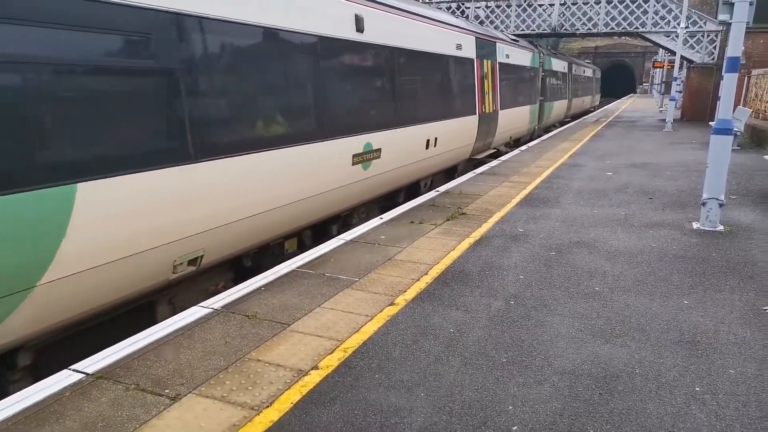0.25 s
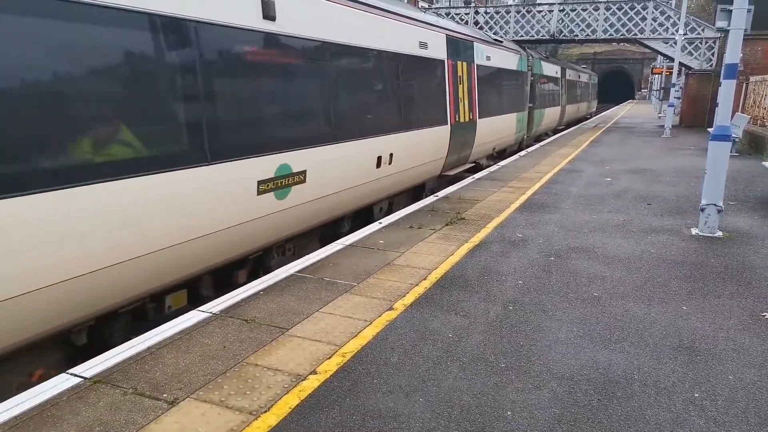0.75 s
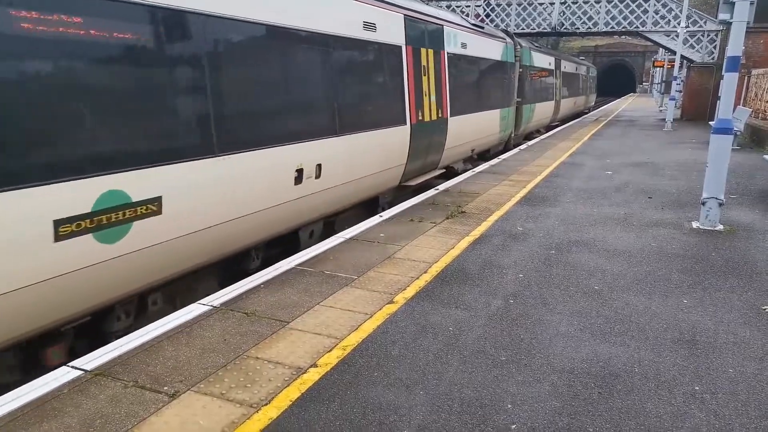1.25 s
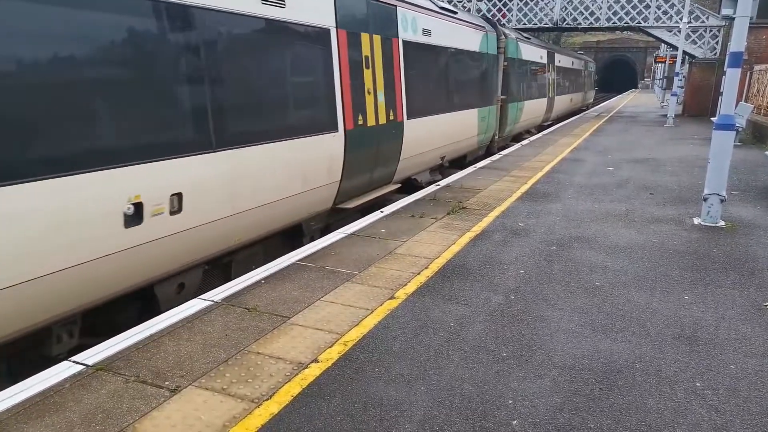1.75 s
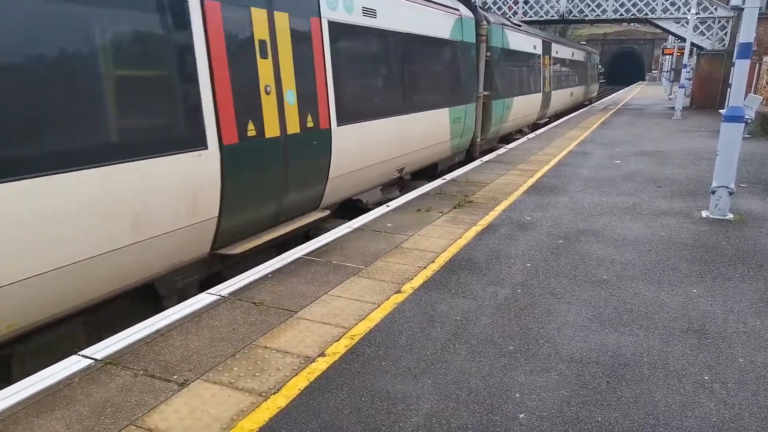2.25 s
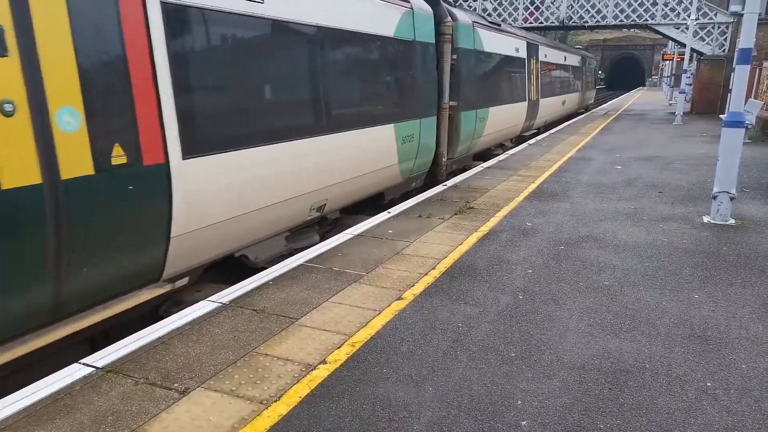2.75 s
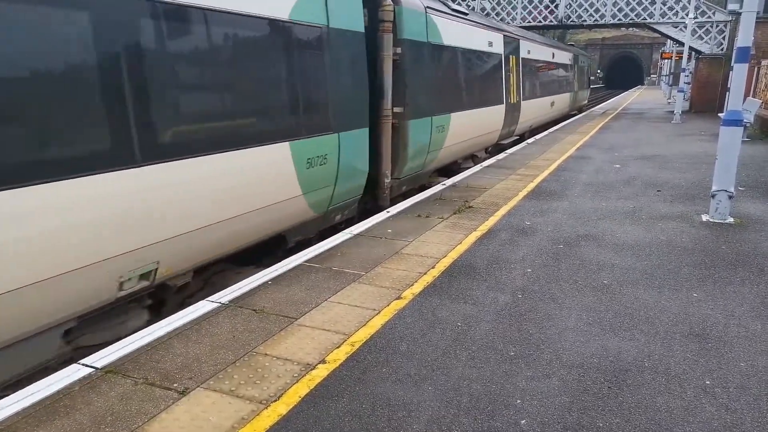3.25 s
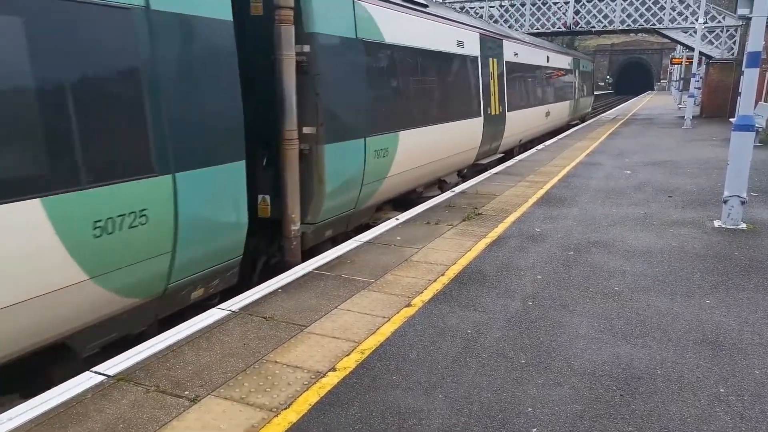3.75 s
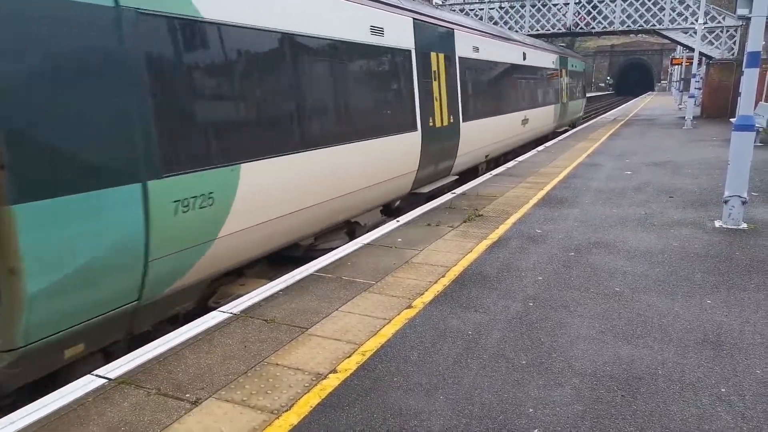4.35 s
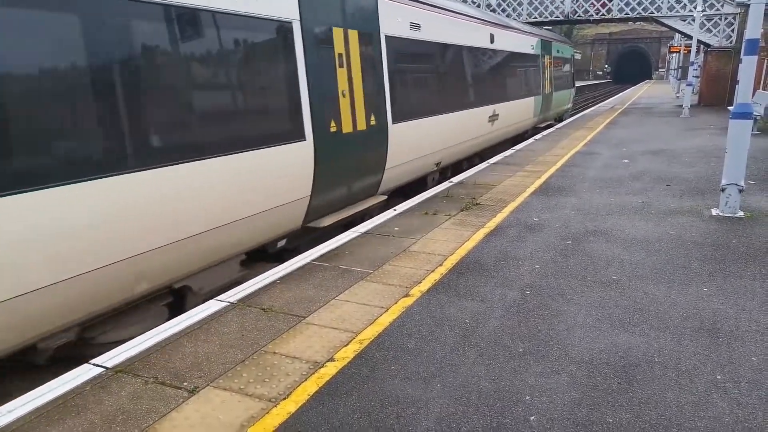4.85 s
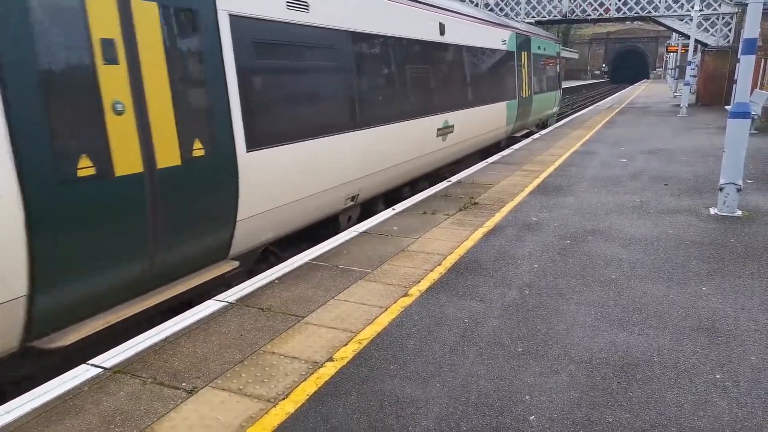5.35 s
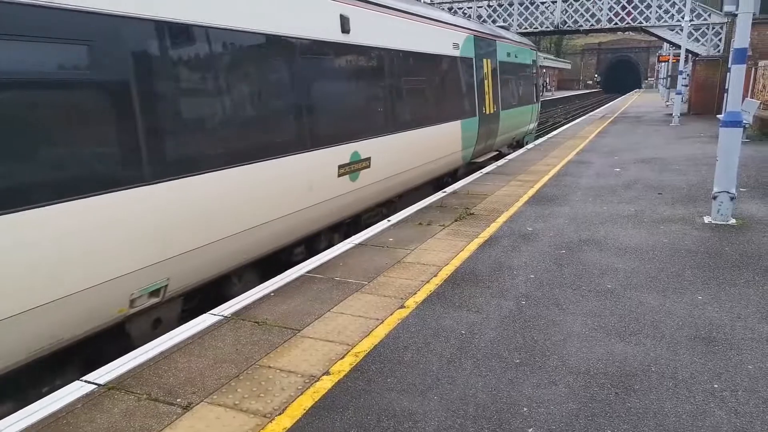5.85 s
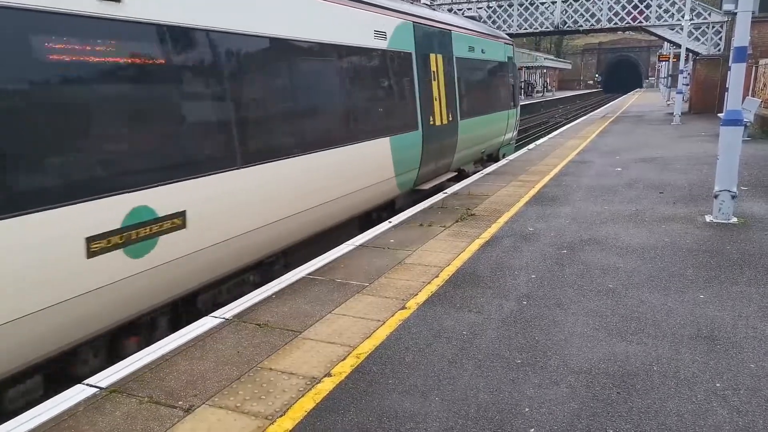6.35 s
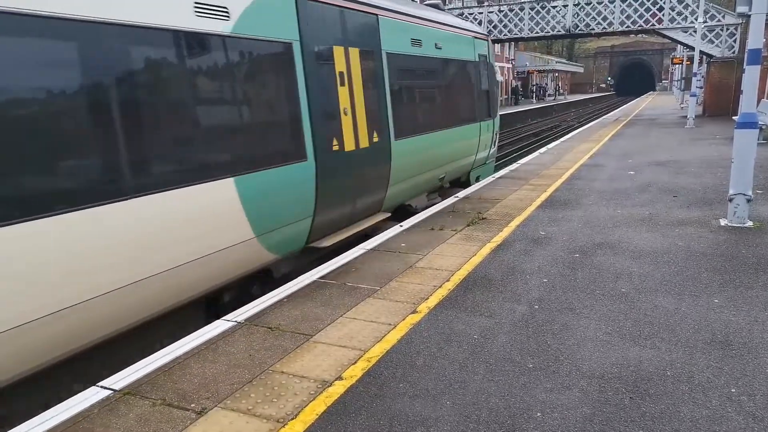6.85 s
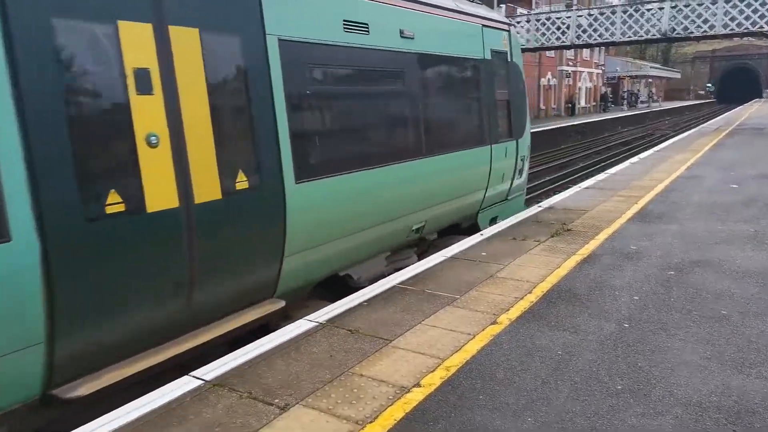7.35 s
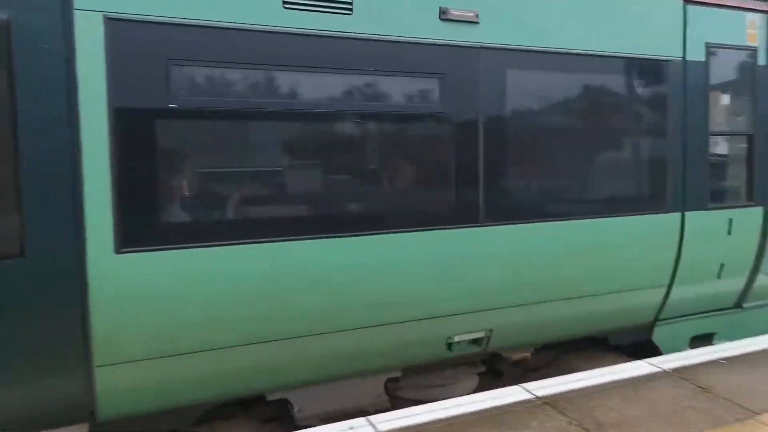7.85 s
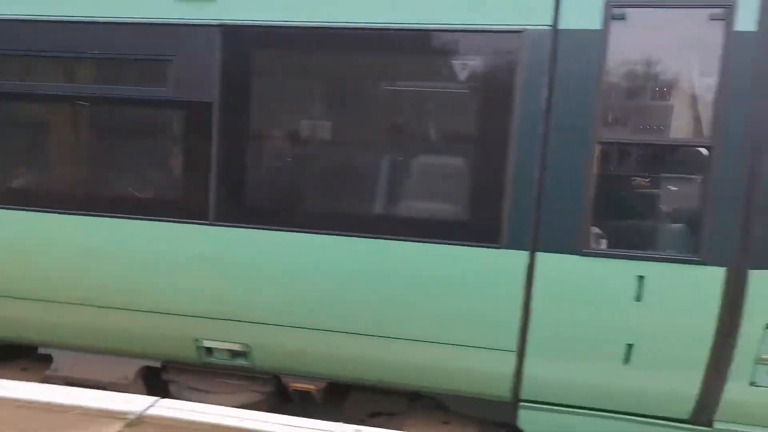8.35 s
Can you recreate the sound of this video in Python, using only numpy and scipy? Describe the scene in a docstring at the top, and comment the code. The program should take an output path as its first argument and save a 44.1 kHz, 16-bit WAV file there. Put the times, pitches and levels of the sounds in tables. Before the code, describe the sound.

Outdoors on a station platform, a nearby stereo microphone catches diesel carriages rolling by. Low exhaust throbbing and rough roar dominate, booming hardest halfway through. Engine rattles and hollow metallic rings come and go, with a thin flange squeal near the start. The second engine brings bright rattle and hiss, then a few whining swells, leaving softer hum and rumble.

```python
"""Two six-cylinder underfloor diesels pull a train out past a platform: exhaust harmonics a few hertz apart beat,
and boom and dip as the train goes by, over rumble and puffed roar from the gas.
Firing-pulsed noise gives engine clatter and charge air; wavering tones and narrow noise give transmission whine,
flange squeal and turbochargers. Fans, auxiliary hum and ringing hollows lie behind. Two ports hear it all."""
import sys
import numpy as np
from scipy import signal
from scipy.fft import rfft, irfft, next_fast_len
from scipy.io import wavfile
from scipy.ndimage import uniform_filter1d, minimum_filter1d

SR = 44100
rng = np.random.default_rng(int(sys.argv[2]) if len(sys.argv) > 2 else 0)


def int16_out(signal):
    """Quantize to a 16-bit WAV file."""
    q = np.round(np.clip(np.atleast_2d(signal).T, -1, 1) * 32767)
    wavfile.write(sys.argv[1], SR, q.astype(np.int16))


N = 379260
TIME_S = np.arange(N) / SR
BINS_HZ = np.maximum(np.arange(N // 2 + 1) * SR / N, 1)

# Pass tables: nearest_s, level_db, approach_s, retreat_s
# Swell tables: loudest_s, level_db, rise_s, fall_s
# Both are sampled by passing(); level_db is before flutter and any named offset.

# engine speeds: time_s, leading_firing_hz, second_firing_hz
ENGINE_SPEEDS = [(0, 80.1, 85.35), (1.15, 80.2, 85.0), (1.7, 80.9, 84.9), (3, 81.1, 84.3),
                 (4.85, 81.05, 84.2), (5.5, 80.7, 84.2), (6.3, 80.5, 83.3), (8.6, 80.4, 82.2)]

# leading exhaust, third firing harmonic, as it booms and dips while the train goes by:
# time_s, level_db (before BOOM_OFFSET_DB)
BOOM_LEVELS = [(0.06, -31.5), (0.1, -24.5), (0.48, -36.5), (0.7, -24.5), (1.1, -27), (1.12, -49),
               (1.29, -21.5), (2.35, -16.5), (2.61, -43), (2.78, -18.5), (3.01, -14), (3.77, -26),
               (4.48, -4.5), (4.83, -12.5), (5.62, -10), (5.85, -28.5), (6.18, -40), (6.33, -25.5),
               (6.82, -21), (7.04, -40.5), (8.24, -37), (8.55, -41.5)]
BOOM_OFFSET_DB = -0.5
# other firing harmonics as the stacks go by: pass columns
FIRST_PASSES = [(2.2, -42.5, 0.99, 0.79), (3.85, -34.5, 0.37, 1.73), (6.85, -41, 0.32, 0.52)]
SECOND_PASSES = [(2.3, -35, 0.82, .65), (4.7, -28.5, 0.76, .6), (6.55, -35, 0.088, 0.28)]
REAR_THIRD_PASSES = [(1.0, -30.5, 1.3, 1.3), (3.45, -28.5, 0.084, 0.35), (4.6, -32, 0.36, 0.6),
                     (8.1, -25, .3, 0.38)]
FOURTH_PASSES = [(3.05, -28, 0.14, 0.52), (4.65, -30.5, .3, 0.53)]
REAR_FIRST_DB, REAR_SECOND_DB, REAR_FOURTH_DB = -6, 4, -9.5  # second engine against the leading one
# the car body comes between the stacks and the platform
SHADOW_S, SHADOW_FADE_S, NOTE_SHADOW_DB, RUMBLE_SHADOW_DB = 5.86, 0.046, -20.5, -12
# lag of the exhaust notes at the right port: time_s, lag_s
NOTE_LAGS = [(0, 0.00007), (1, 0.00011), (3.2, 0.00028), (4.6, 0.00013), (5.3, 0.00019), (6.5, 0.00033)]

# exhaust gas: pass columns
RUMBLE_PASSES = [(4.1, -28, 1.33, 1.48)]
ROAR_PASSES = [(3.0, -36.5, 1.9, 0.8), (4.85, -34.5, 0.39, 0.42), (6.8, -37.5, 0.22, 0.6)]
RUMBLE_FOLLOWS, ROAR_FOLLOWS = 0.07, 0.11  # dB per dB of boom
ROAR_LUMPS = 8.8  # weight of the unequal firings in the roar

# engine bay parts: pass columns
KNOCK_PASSES = [(.4, -49, 0.17, 0.55), (1.45, -50.5, 0.22, 0.6), (3.55, -57, 0.34, 0.56),
                (5.42, -48.5, 0.31, .55)]
CLATTER_PASSES = [(.6, -48, 0.89, 1), (2.4, -42, 0.66, 0.44), (3.4, -48, 0.082, 0.22),
                  (5.9, -38.5, 0.26, 0.24)]
RATTLE_PASSES = [(1.7, -53, 0.79, .4), (2.55, -42, 0.22, 0.34), (6.15, -36.5, 0.28, 0.13),
                 (6.9, -50, .3, 0.61)]

# charge air and radiator fans: pass columns
RUSH_PASSES = [(2.7, -54, 0.54, 0.49), (6.05, -47.5, 0.29, 0.68)]
HISS_PASSES = [(3.3, -70.5, 0.2, .4), (6.08, -47.5, 0.2, 0.44)]
FAN_PASSES = [(2.3, -39.5, 0.52, 0.88), (6.1, -42, 0.34, 0.63)]
FAN_SPILL_DB = -5.5  # heard outside the beam of the grilles

# transmission whine: time_s, pitch_hz; then swell columns
WHINE_PITCH = [(1.2, 511), (2.6, 505), (3.8, 496), (6.2, 492), (7.1, 484), (7.4, 490)]
WHINE_SWELLS = [(1.0, -49.5, 0.39, .4), (1.92, -35, 0.059, 0.067), (2.85, -31, 0.15, .16),
                (3.45, -38.5, 0.066, 0.13), (6.5, -33, 0.21, 0.53), (7.0, -29, 0.063, 0.079),
                (7.17, -25.5, .08, 0.054), (7.46, -38, 0.046, 0.025)]
# singing wheel flange, sinking in pitch: time_s, pitch_hz; then swell columns
SQUEAL_PITCH = [(0, 1748), (2.7, 1678)]
SQUEAL_SWELLS = [(.3, -45, .3, 0.33), (1.33, -33.5, 0.087, 0.16), (1.93, -42, 0.18, 0.11),
                 (2.4, -49, 0.22, 0.14)]
SQUEAL_RASP_DB = -9  # friction noise against the tone

# turbocharger blade tones: time_s, pitch_hz
TURBO_FRONT_PITCH = [(0, 9150), (2.8, 9060), (5, 9000)]
TURBO_REAR_PITCH = [(4.4, 8560), (5.43, 8678), (7.1, 8665), (8.6, 8800)]
# breathy blade tones: pass columns
TURBO_FRONT_PASSES = [(2.75, -52, 0.58, 0.27)]
TURBO_REAR_PASSES = [(6.4, -54.5, .6, 0.95)]
# pure rear tone as the intake faces the platform: swell columns
TURBO_FLARES = [(5.5, -43.5, 0.03, 0.095), (5.84, -38, 0.062, 0.038)]

# auxiliary machines under the last car: pass columns
THROB_HZ, PUMP_HZ = 33.4, 178.5
COMPRESSOR_PASSES = [(6.5, -51, 0.39, 0.85)]
PUMP_PASSES = [(6.62, -33, 0.093, 0.16), (8.0, -53.5, 0.62, 0.65)]

# ringing hollows, and last two low throbs of the beating exhausts (8.025, 8.329 s):
# loudest_s, half_length_s, centre_hz, width_hz, peak_db
HOLLOWS_AND_THROBS = [(1.03, 0.25, 890, 400, -47), (1.73, 0.082, 2320, 450, -38.5),
                      (1.877, 0.053, 730, 120, -47), (1.926, 0.11, 2560, 350, -38),
                      (2.14, 0.035, 940, 120, -37), (2.15, 0.16, 2350, 260, -37),
                      (2.497, 0.067, 2230, 350, -30.5), (3.09, 0.11, 757, 119, -37.5),
                      (3.3, 0.27, 932, 132, -37.5), (3.555, 0.14, 1125, 260, -41.5),
                      (4.953, 0.15, 512, 147, -33.5), (5.511, .09, 2710, 400, -42.5),
                      (5.856, 0.12, 2840, 450, -38), (5.95, 0.33, 1000, 128, -38.5),
                      (5.97, 0.11, 2290, 297, -38.5), (6.15, 0.11, 1980, 294, -39.5),
                      (6.2, 0.22, 837, 100, -37.5), (6.61, 0.19, 945, 110, -39),
                      (7.023, .35, 5200, 497, -53.5), (8.025, 0.059, 249, 59.7, -33),
                      (8.183, 0.034, 535, 493, -39), (8.329, 0.021, 238, 80, -30)]

# spectra of the noise sources: frequency_hz, gain_db
RUMBLE_SPECTRUM = [(25, -42), (55, -26), (110, -5), (155, -0.5), (200, 5), (232, 14.5), (270, -2),
                   (330, -18.5), (500, -75.5)]
ROAR_SPECTRUM = [(150, -9.5), (275, 0.5), (350, 6.5), (420, 1), (500, -5.5), (650, -9.5), (1600, -68.5)]
FAN_SPECTRUM = [(300, -18.5), (550, 5), (760, 7), (850, 5), (960, 6), (1120, -4), (2000, -50)]
KNOCK_SPECTRUM = [(700, -11), (1150, 5.5), (1450, 6), (1800, 2.5), (3500, -44.5)]
CLATTER_SPECTRUM = [(1300, -55), (1800, -5.5), (2100, 1.5), (2330, 3), (2550, 0), (2900, -6), (5000, -40.5)]
RATTLE_SPECTRUM = [(2000, -46.5), (2800, 4), (3300, 3), (3900, 5.5), (4400, 2.5), (4900, -12.5),
                   (7500, -51)]
RUSH_SPECTRUM = [(3500, -2.5), (5000, 3.5), (6600, 2.5), (7600, -1), (8400, -5.5), (9500, -4.5),
                 (11500, -33.5)]
HISS_SPECTRUM = [(6500, -26), (8300, 3), (9200, 4), (10200, 4), (11500, 0.5), (12900, -19.5), (13800, -1.5),
                 (15000, -30.5)]

# port balance: frequency_hz, left_minus_right_db
PORT_BALANCE = [(60, -2.5), (250, -3.5), (500, -4.5), (950, -7), (1300, -1.5), (1800, -5.5), (2300, -15.5),
                (3100, -6.5), (4100, -14.5), (5200, -7), (7000, 0), (9200, 14), (12000, 5)]
PORT_LAG_S = 0.0004107  # right after left
# sound scattered by train side and platform: frequency_hz, scattered_against_direct_db
SCATTER = [(60, -1), (250, -29), (500, -8), (1000, 3.5), (2200, -3.5), (4500, 3), (12000, 9)]
LOW_CUT_HZ, TOP_HZ = 30, 15000


def undb(db):
    """Decibels to amplitude gain."""
    return 10 ** (np.asarray(db) / 20)


def curves(table):
    """Columns of a table, interpolated linearly in time."""
    time_s, *columns = np.transpose(table)
    return [np.interp(TIME_S, time_s, column) for column in columns]


def shape_db(points):
    """Spectrum at every bin, linear in dB over log frequency."""
    hz, db = np.transpose(points)
    return np.interp(np.log(BINS_HZ), np.log(hz), db)


def walk(rate_hz):
    """Smooth unit-spread random drift, low-passed near rate_hz on a coarse time grid."""
    coarse_s = TIME_S[::30]
    hz = np.arange(len(coarse_s) // 2 + 1) * SR / N
    spectrum = rfft(rng.standard_normal(len(coarse_s))) * np.exp(-(hz / rate_hz) ** 2)
    drift = irfft(spectrum, len(coarse_s))
    return np.interp(TIME_S, coarse_s, drift / np.std(drift))


def passing(table, falloff=2, far_db=-120):
    """Level in dB: half power at the approach and retreat times, over a distant remainder.
    Falloff 2 is the inverse square law; sound beamed from under the cars falls faster."""
    coarse_s = TIME_S[::200]
    power = undb(far_db) ** 2
    for nearest_s, db, approach_s, retreat_s in table:
        half_s = np.where(coarse_s < nearest_s, approach_s, retreat_s)
        away = np.abs((coarse_s - nearest_s) / half_s)
        power = power + undb(db) ** 2 / (1 + away ** falloff)
    return np.interp(TIME_S, coarse_s, 10 * np.log10(power))


def turns_of(hz):
    """Cycles completed at a changing rate."""
    return np.cumsum(hz) / SR


def sine(turns, rms_db):
    """Tone of the given rms level."""
    return np.sqrt(2) * undb(rms_db) * np.sin(2 * np.pi * turns)


def whistle(pitch, db, wobble_hz, wobble_rate_hz, flutter_db):
    """Tone drifting randomly in pitch and level."""
    hz = curves(pitch)[0] + wobble_hz * walk(wobble_rate_hz)
    return sine(turns_of(hz), db + flutter_db * walk(17))


def breathy_whistle(pitch, db, width_hz):
    """Tone smeared into a thin noise band by random modulation of two quadrature carriers."""
    turns = turns_of(curves(pitch)[0])
    in_phase = walk(width_hz) * sine(turns, db)
    quadrature = walk(width_hz) * sine(turns + 0.25, db)
    return (in_phase + quadrature) / np.sqrt(2)


def puffs(firings, decay_cycles, steady):
    """Noise that flares at each firing and decays within the cycle, over a steady part."""
    flare = np.exp(-(firings % 1) / decay_cycles)
    return rng.standard_normal(N) * (steady + flare)


def uneven(firings, scatter):
    """Excess of each firing over the mean: six unequal cylinders plus chance."""
    at = np.flatnonzero(np.diff(np.floor(firings)))
    cylinders = np.array([1, -1, 0, 1, 0, -1])
    pulses = np.zeros(N)
    pulses[at] = np.resize(cylinders, len(at)) + scatter * rng.standard_normal(len(at))
    return pulses


def ports(x, scattered=True):
    """Two ports: the right lags, and scattered sound reaches each with its own random phases."""
    lag = np.exp(-2j * np.pi * BINS_HZ * PORT_LAG_S)
    pair = rfft(x, N) * np.array([np.ones(len(BINS_HZ)), lag])
    if scattered:
        share = undb(shape_db(SCATTER))
        phases = np.exp(2j * np.pi * rng.random(pair.shape))
        pair = pair * (1 + share * phases) / np.sqrt(1 + share ** 2)
    sides = undb(np.array([[0.5], [-0.5]]) * shape_db(PORT_BALANCE))
    return irfft(pair * sides / sides.mean(axis=0), N)


def radiate(drive, spectrum, db, band_hz):
    """A drive rings a body of the given spectrum; db is the level within band_hz."""
    pair = ports(irfft(rfft(drive) * undb(shape_db(spectrum)), N))
    in_band = (BINS_HZ > band_hz[0]) * (BINS_HZ < band_hz[1])
    inside = irfft(rfft(pair.mean(axis=0)) * in_band, N)
    return pair / np.std(inside) * undb(db)


def hollows_and_throbs():
    """Hollows ring, and two late exhaust beats throb: narrow bands of noise that swell and fade."""
    out = np.zeros((2, N))
    din = ports(rng.standard_normal(N))
    for loudest_s, half_s, hz, width_hz, db in HOLLOWS_AND_THROBS:
        near = np.flatnonzero(np.abs(TIME_S - loudest_s) < 1)
        size = next_fast_len(len(near))
        bins_hz = np.arange(size // 2 + 1) * SR / size
        resonance = 1 / (1 + ((bins_hz - hz) / width_hz * 2) ** 2)
        ring = irfft(rfft(din[:, near], size) * resonance, size)[:, :len(near)]
        swell = np.exp(-((TIME_S[near] - loudest_s) / half_s) ** 2)
        out[:, near] += ring / np.std(ring.mean(axis=0)) * undb(db) * swell
    return out


def auxiliaries():
    """A compressor throbs and a pump hums under the floor, as fluttering sines."""
    throb_db = passing(COMPRESSOR_PASSES, falloff=3.2, far_db=-63.5) + 1.2 * walk(6)
    pump_db = passing(PUMP_PASSES, falloff=1.4) + 3.8 * walk(5.9)
    return sine(THROB_HZ * TIME_S, throb_db) + sine(PUMP_HZ * TIME_S, pump_db)


def fans():
    """Radiator fans churn the air in quick gusts, loudest while their grilles face the platform."""
    beam = undb(passing(FAN_PASSES, falloff=9.7))
    spill = undb(passing(FAN_PASSES, falloff=2.0, far_db=-50) + FAN_SPILL_DB)
    db = 20 * np.log10(np.hypot(beam, spill)) + 1.8 * walk(14)
    return radiate(rng.standard_normal(N), FAN_SPECTRUM, db, (650, 1150))


def charge_air(firings):
    """Air rushes and hisses through the intake ducts, pulsed slightly by the valves."""
    rush_db = passing(RUSH_PASSES, falloff=2.74, far_db=-67)
    hiss_db = passing(HISS_PASSES, falloff=3.37, far_db=-85)
    rush, hiss = (puffs(firings, decay_cycles=0.25, steady=0.7) * undb(0.5 * walk(13)) for _ in range(2))
    rush_pair = radiate(rush, RUSH_SPECTRUM, rush_db, (5200, 8200))
    return rush_pair + radiate(hiss, HISS_SPECTRUM, hiss_db, (9600, 12000))


def turbochargers():
    """Turbulence smears the blade tones; the rear one turns pure as its intake faces the platform."""
    front_db = passing(TURBO_FRONT_PASSES, falloff=2.2)
    rear_db = passing(TURBO_REAR_PASSES, falloff=3)
    flare_db = passing(TURBO_FLARES, falloff=5.1)
    front = breathy_whistle(TURBO_FRONT_PITCH, front_db, width_hz=130)
    rear = breathy_whistle(TURBO_REAR_PITCH, rear_db, width_hz=62)
    flares = whistle(TURBO_REAR_PITCH, flare_db, wobble_hz=8, wobble_rate_hz=90, flutter_db=1.5)
    return front + rear + flares


def wheel_flange():
    """A wheel flange sings: a wavering tone with a band of friction noise around it."""
    db = passing(SQUEAL_SWELLS, falloff=5.0)
    tone = whistle(SQUEAL_PITCH, db, wobble_hz=9, wobble_rate_hz=60, flutter_db=2.6)
    return tone + breathy_whistle(SQUEAL_PITCH, db + SQUEAL_RASP_DB, width_hz=210)


def transmissions():
    """Transmission whine: a wavering tone that comes in swells."""
    db = passing(WHINE_SWELLS, falloff=3.4)
    return whistle(WHINE_PITCH, db, wobble_hz=2, wobble_rate_hz=12, flutter_db=1.6)


def engine_bays(front, rear):
    """Each combustion knocks the block; valve gear and injectors rattle in step."""
    knock_db = passing(KNOCK_PASSES, falloff=2.8, far_db=-63) + 1.8 * walk(20)
    clatter_db = passing(CLATTER_PASSES, falloff=2.77, far_db=-53) + 1.5 * walk(17)
    rattle_db = passing(RATTLE_PASSES, falloff=3.0, far_db=-59.5) + 1.5 * walk(15)

    def blows():
        """Firing-timed noise of both engines."""
        return puffs(front, decay_cycles=0.031, steady=0.72) + puffs(rear, decay_cycles=0.064, steady=0.033)

    knock = radiate(blows(), KNOCK_SPECTRUM, knock_db, (1250, 1620))
    clatter = radiate(blows(), CLATTER_SPECTRUM, clatter_db, (1950, 2800))
    rattle = radiate(blows(), RATTLE_SPECTRUM, rattle_db, (3100, 4700))
    return knock + clatter + rattle


def shadow():
    """How far the car body hides the exhaust stacks, 0 to 1."""
    return 0.5 + 0.5 * np.tanh((TIME_S - SHADOW_S) / SHADOW_FADE_S)


def exhaust_gas(front, rear):
    """Uneven firings rumble in the silencers; gas roars out in puffs. Both rise with the boom."""
    boom_db = curves(BOOM_LEVELS)[0]
    swell_db = boom_db - boom_db.mean()
    rumble_db = passing(RUMBLE_PASSES) + RUMBLE_FOLLOWS * swell_db + RUMBLE_SHADOW_DB * shadow()
    roar_db = passing(ROAR_PASSES, falloff=1.94, far_db=-49.5) + ROAR_FOLLOWS * swell_db
    lumps = uneven(front, scatter=1.0) + uneven(rear, scatter=1.0)
    gas = puffs(front, decay_cycles=0.16, steady=1.0) + puffs(rear, decay_cycles=0.35, steady=0.21)
    rumble = radiate(lumps, RUMBLE_SPECTRUM, rumble_db, (185, 228))
    return rumble + radiate(gas + ROAR_LUMPS * lumps, ROAR_SPECTRUM, roar_db, (345, 465))


def exhaust_note(firings, levels_db, flutter_db, jitter_cycles):
    """Firing harmonics of one engine, fluttering with the combustion."""
    firings = firings + jitter_cycles * walk(9)
    return sum(sine(k * firings, db + flutter_db * walk(16)) for k, db in enumerate(levels_db, 1))


def exhaust_notes(front, rear):
    """Harmonics of both exhausts swell as the stacks pass; the car body then hides the second."""
    first = passing(FIRST_PASSES, falloff=17, far_db=-44)
    second = passing(SECOND_PASSES, falloff=8, far_db=-41.5)
    boom = curves(BOOM_LEVELS)[0] + BOOM_OFFSET_DB
    rear_third = passing(REAR_THIRD_PASSES, falloff=1)
    fourth = passing(FOURTH_PASSES, falloff=3.9, far_db=-50)
    front_db = [first, second, boom, fourth]
    rear_db = np.array([first + REAR_FIRST_DB, second + REAR_SECOND_DB, rear_third, fourth + REAR_FOURTH_DB])
    rear_db = rear_db + NOTE_SHADOW_DB * shadow()
    leading = exhaust_note(front, front_db, flutter_db=0.8, jitter_cycles=0.003)
    return leading + exhaust_note(rear, rear_db, flutter_db=1.2, jitter_cycles=0.003)


def bearing(pair):
    """The lag between the ports follows the direction of the exhausts."""
    extra_s = curves(NOTE_LAGS)[0] - PORT_LAG_S
    return np.array([pair[0], np.interp(TIME_S - extra_s, TIME_S, pair[1])])


def scene():
    """Both engines and everything they drive, heard from the platform."""
    front, rear = (turns_of(hz) for hz in curves(ENGINE_SPEEDS))
    background = hollows_and_throbs() + fans() + charge_air(front)
    tones = auxiliaries() + turbochargers() + wheel_flange() + transmissions()
    engines = engine_bays(front, rear) + exhaust_gas(front, rear)
    notes = bearing(ports(exhaust_notes(front, rear), scattered=False))
    return background + ports(tones, scattered=False) + engines + notes


def record(dry):
    """Low cut, a limiter holding peaks at full scale with one gain for both ports, then a steep top cut."""
    low_cut = signal.butter(4, LOW_CUT_HZ, "high", fs=SR, output="sos")
    dry = signal.sosfilt(low_cut, dry)
    room = 1 / np.maximum(np.abs(dry).max(axis=0), 1)
    gain = uniform_filter1d(minimum_filter1d(room, size=900), size=900)
    top_cut = signal.ellip(12, 0.1, 80, TOP_HZ, fs=SR, output="sos")
    return signal.sosfilt(top_cut, dry * gain)


dry = scene()
out = record(dry)
int16_out(out)
```